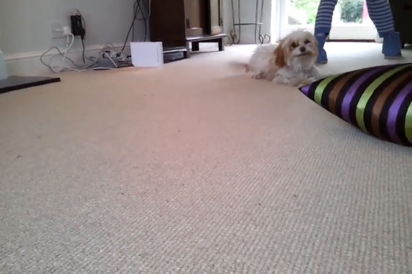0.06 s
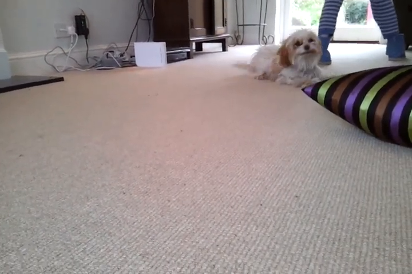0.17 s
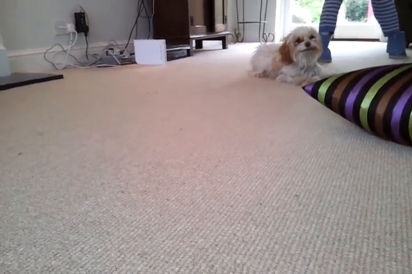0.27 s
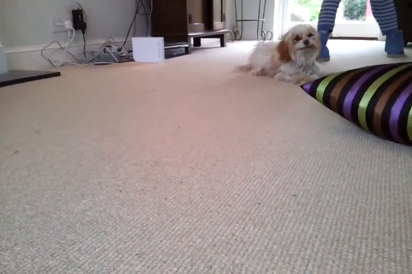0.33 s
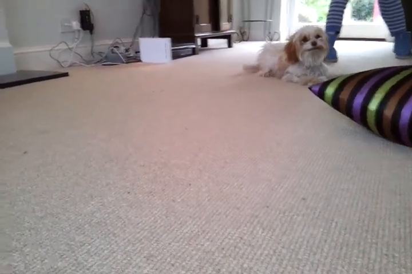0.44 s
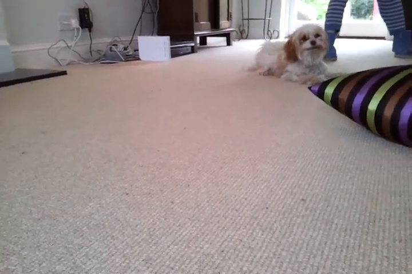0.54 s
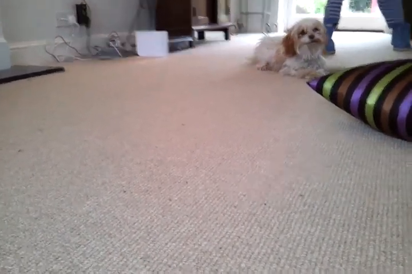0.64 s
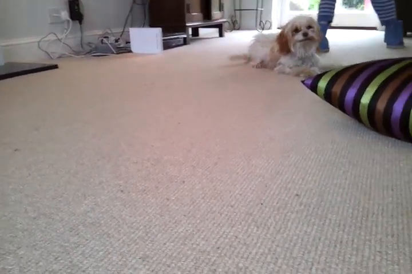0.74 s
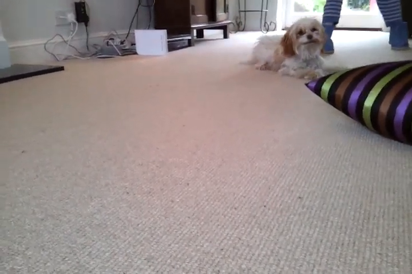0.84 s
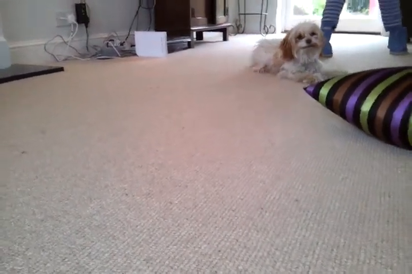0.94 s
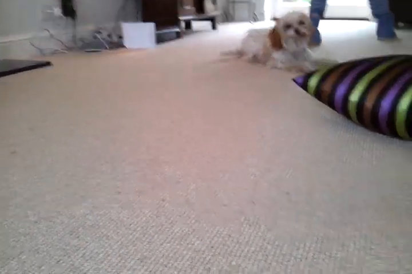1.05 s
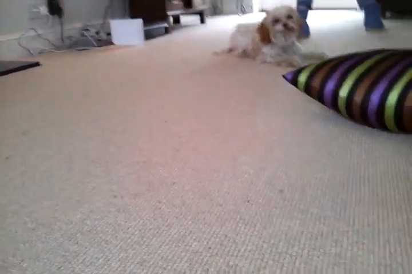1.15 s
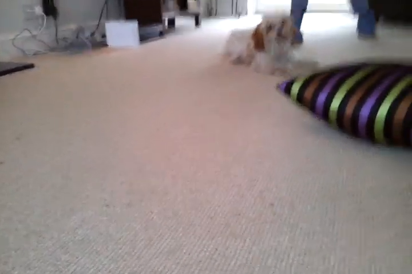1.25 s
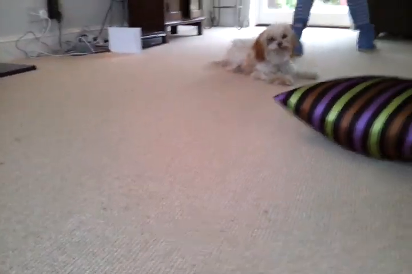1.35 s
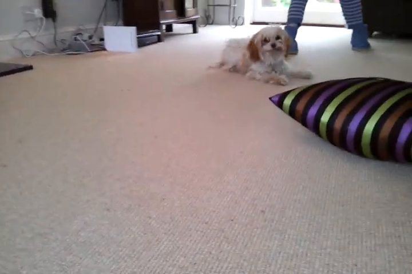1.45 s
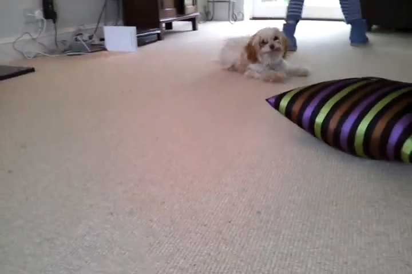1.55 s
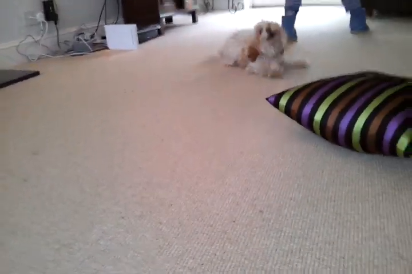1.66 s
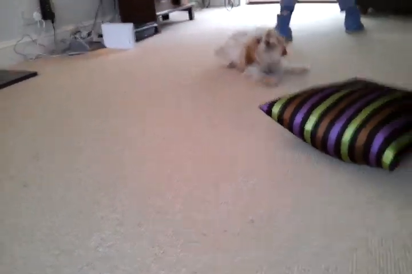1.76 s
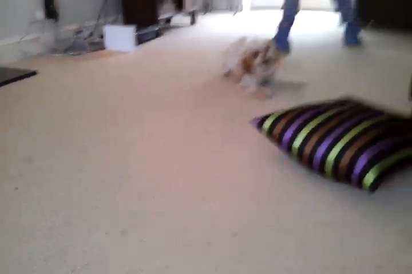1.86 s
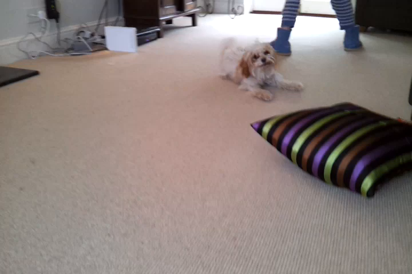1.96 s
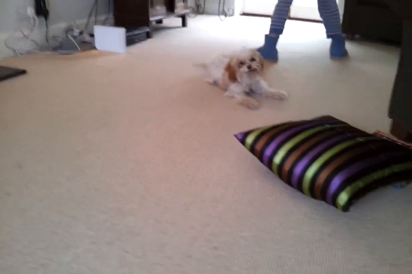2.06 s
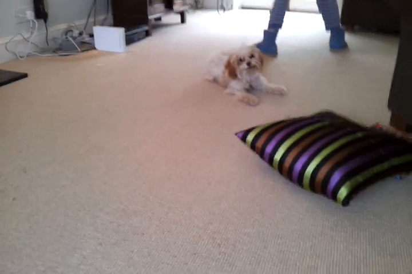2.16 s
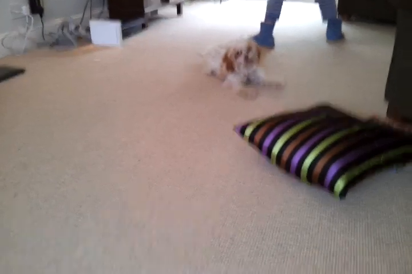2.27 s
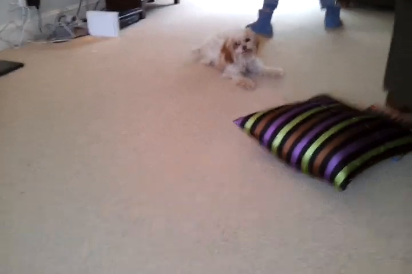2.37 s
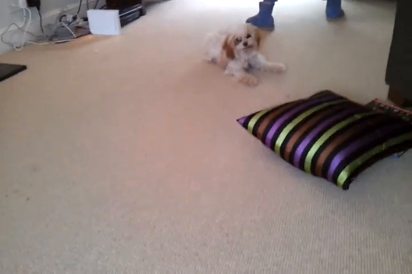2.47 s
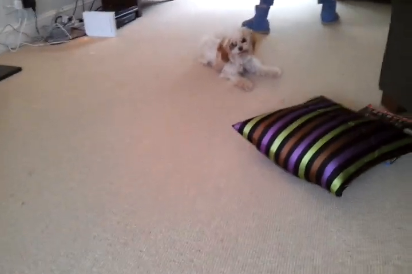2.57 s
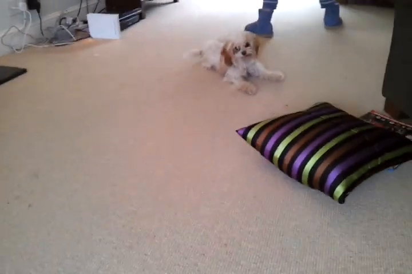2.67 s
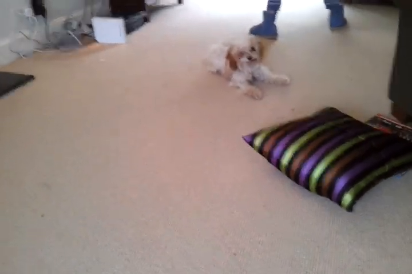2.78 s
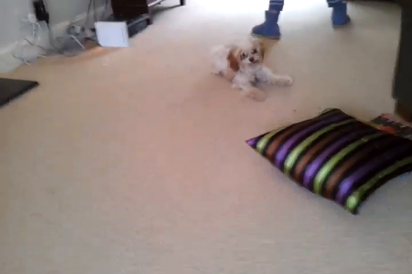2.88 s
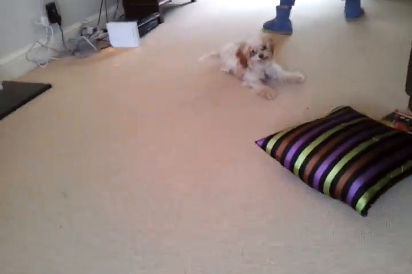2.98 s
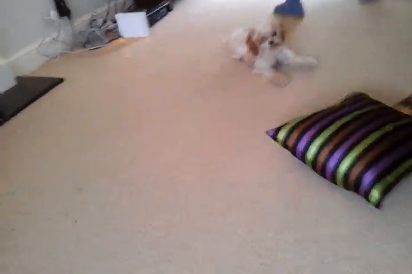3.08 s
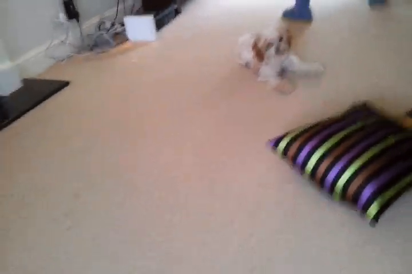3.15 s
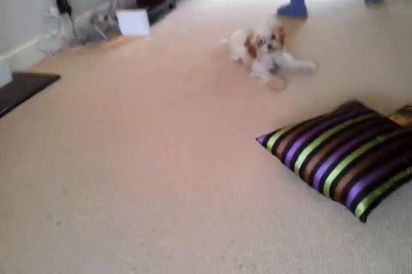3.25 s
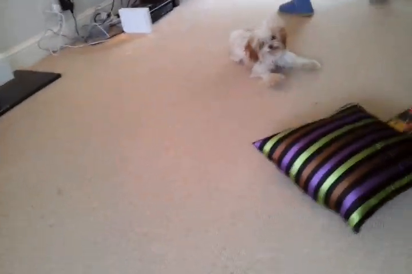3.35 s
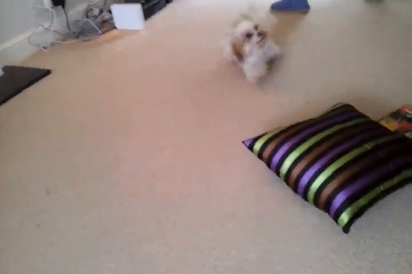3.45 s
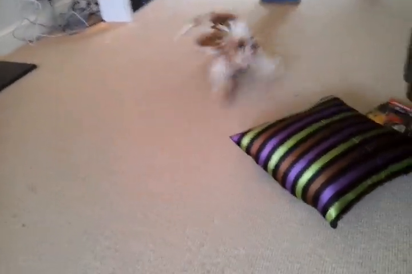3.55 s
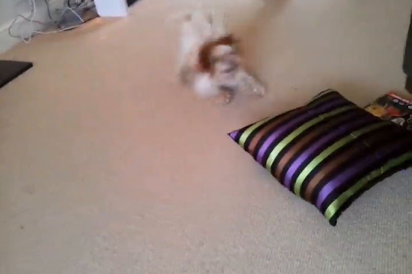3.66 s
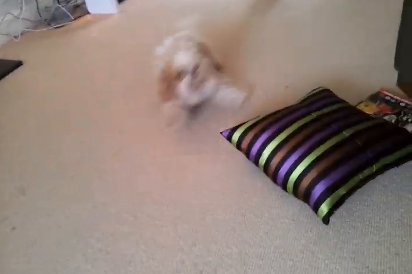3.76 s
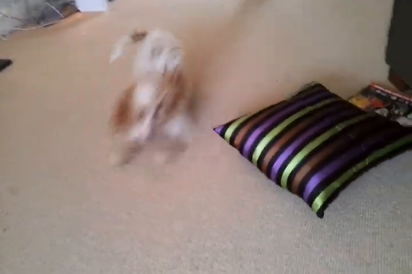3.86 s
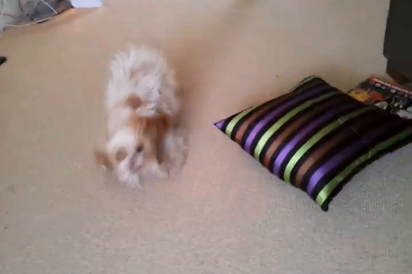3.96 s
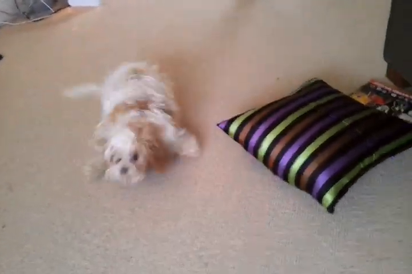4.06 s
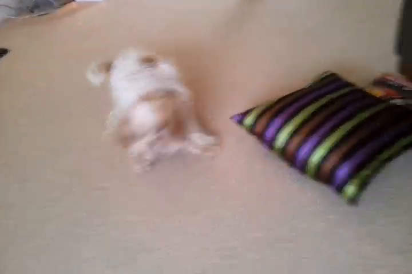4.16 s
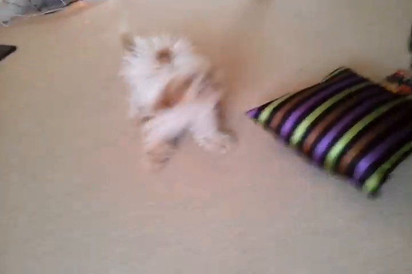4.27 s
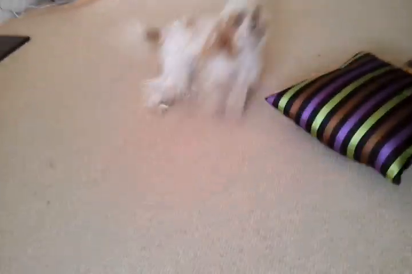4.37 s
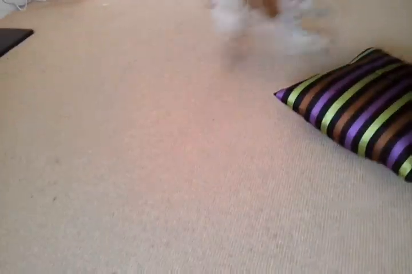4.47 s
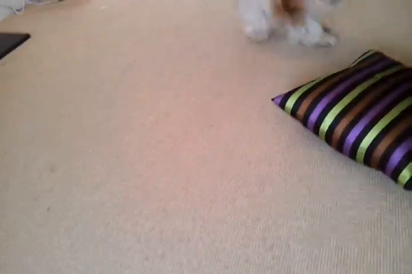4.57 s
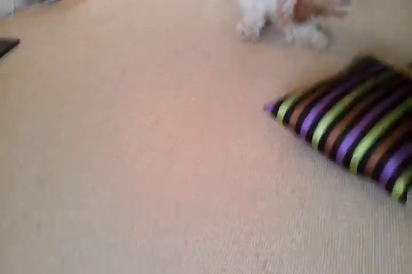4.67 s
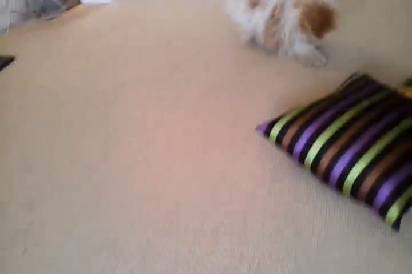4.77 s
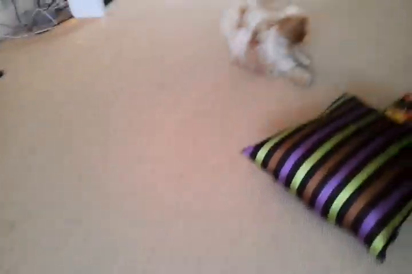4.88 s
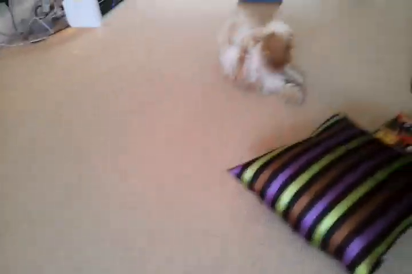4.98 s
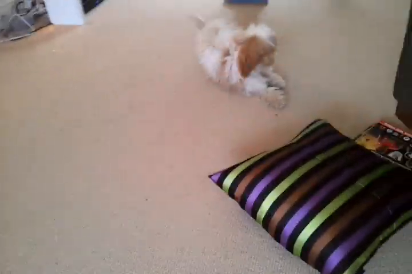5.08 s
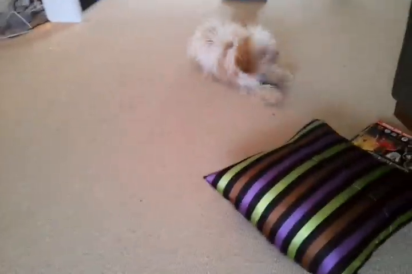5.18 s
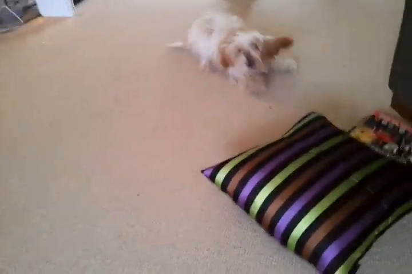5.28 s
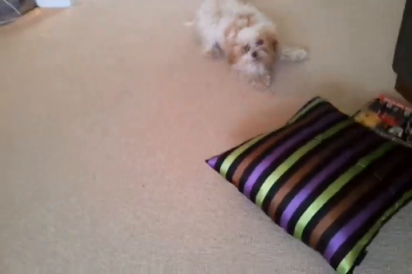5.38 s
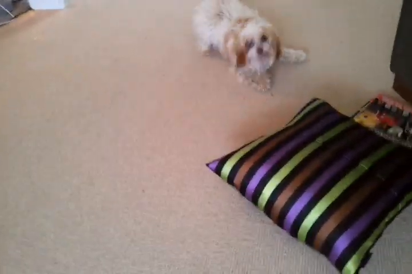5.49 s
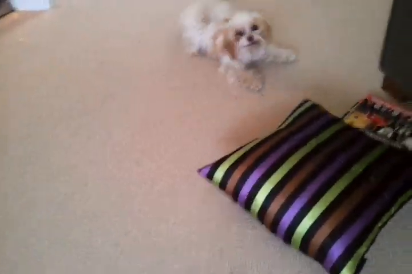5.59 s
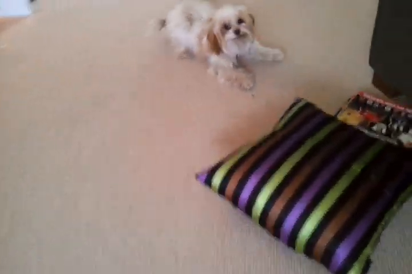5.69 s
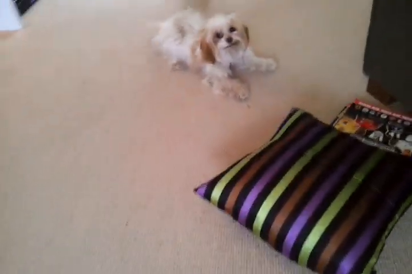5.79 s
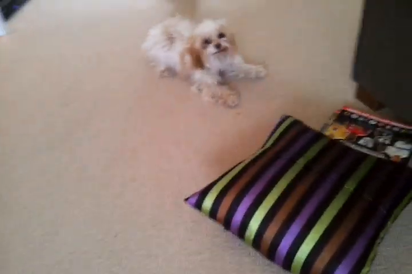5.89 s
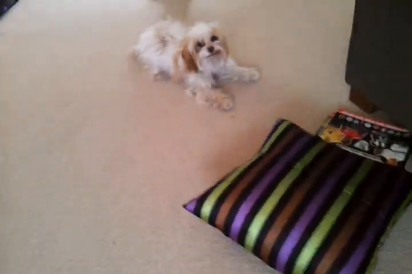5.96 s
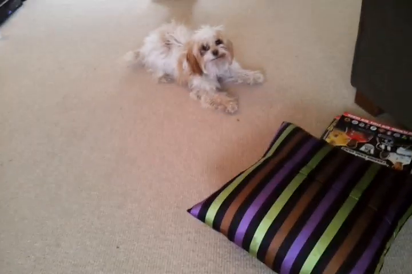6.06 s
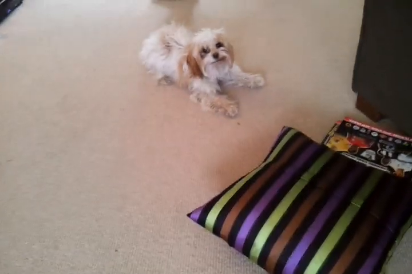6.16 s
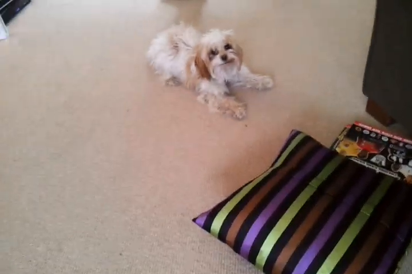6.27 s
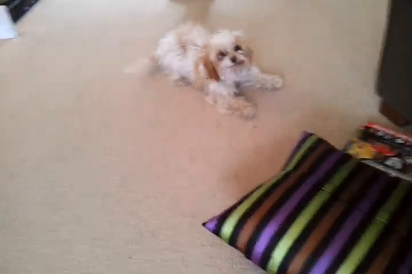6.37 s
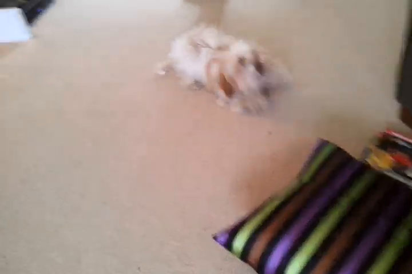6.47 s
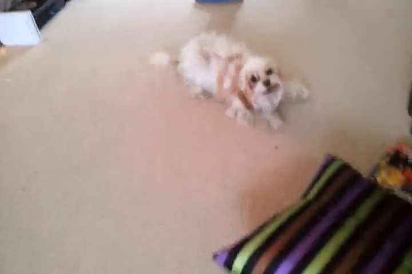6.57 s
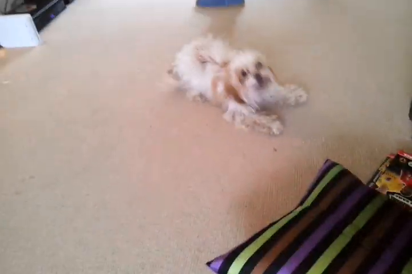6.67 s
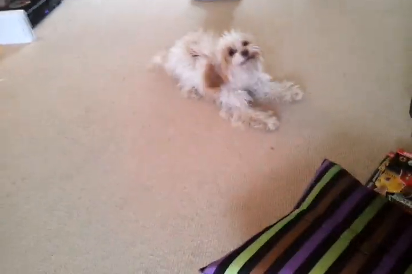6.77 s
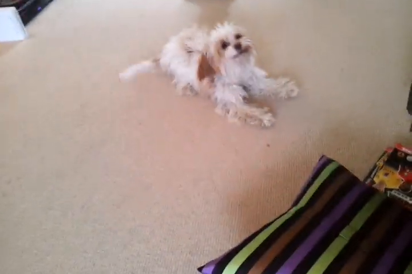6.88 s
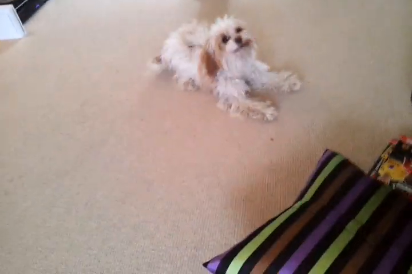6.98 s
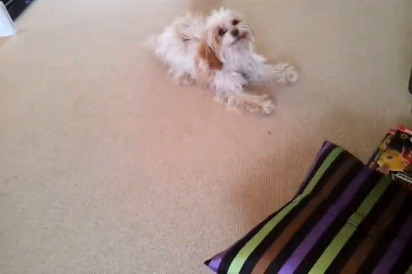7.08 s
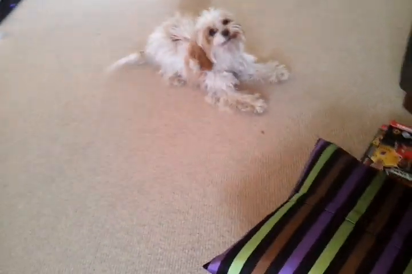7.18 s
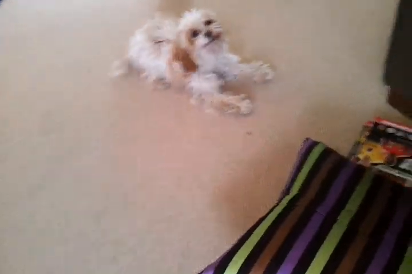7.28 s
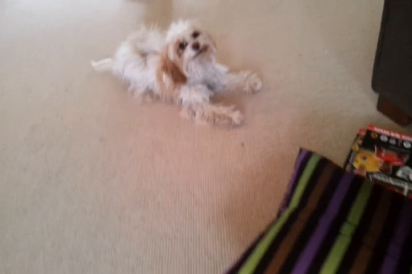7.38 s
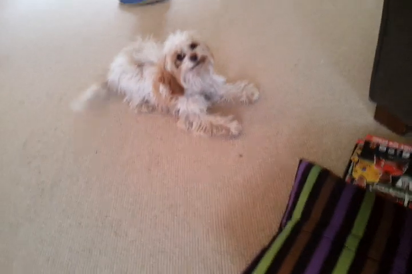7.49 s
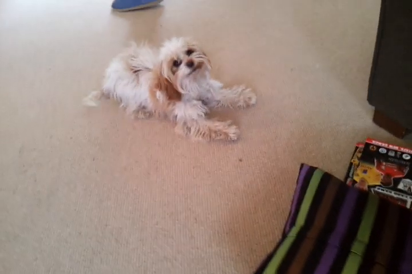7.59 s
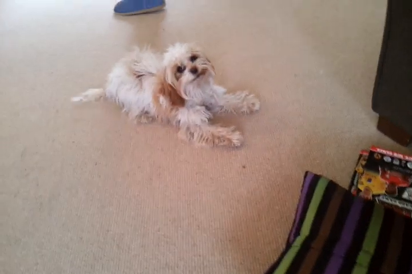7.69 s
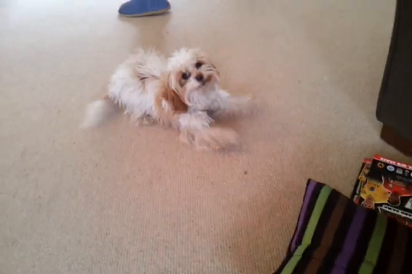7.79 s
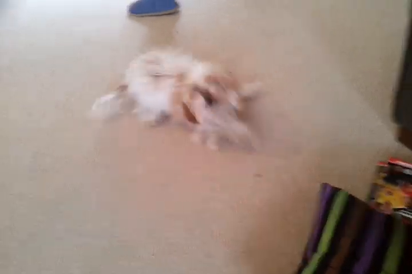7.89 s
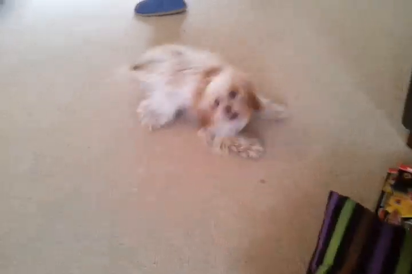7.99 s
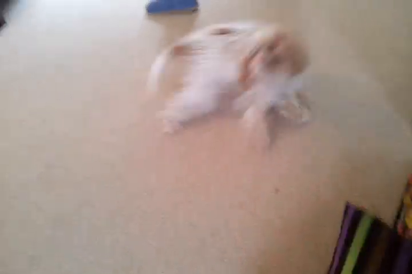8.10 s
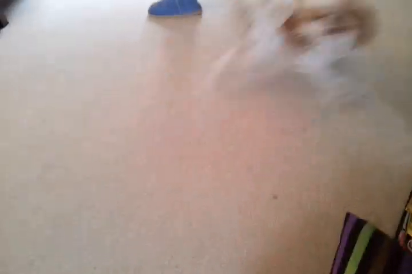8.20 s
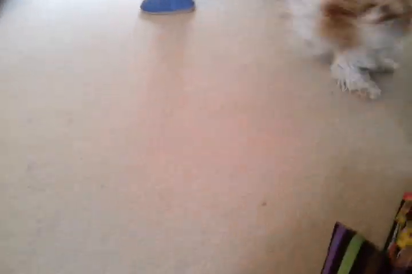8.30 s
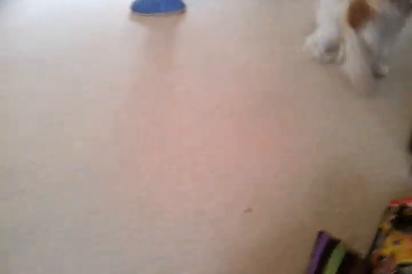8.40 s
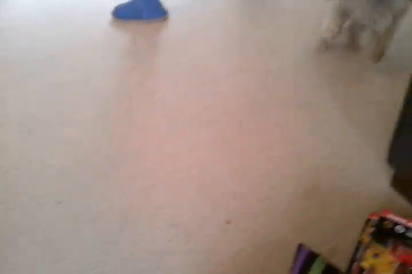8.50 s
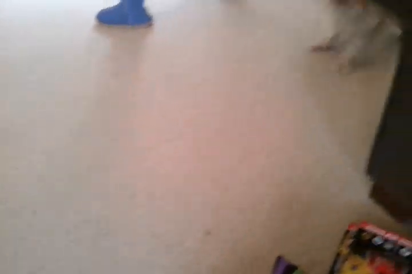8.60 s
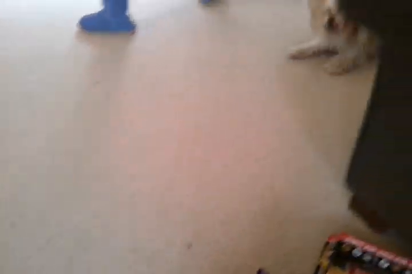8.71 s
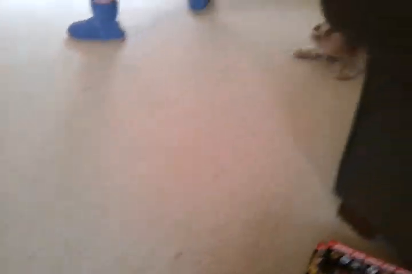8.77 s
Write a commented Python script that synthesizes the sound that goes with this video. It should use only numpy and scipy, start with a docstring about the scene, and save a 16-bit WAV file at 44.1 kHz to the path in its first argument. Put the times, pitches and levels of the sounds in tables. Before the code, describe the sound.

In a quiet furnished room, a little dog lets out short, hoarse yaps, spaced apart at first and then four in quick succession. Between them it grumbles low, with faint whines and wheezes, while its paws thud softly on the carpet and fabric rustles. The loud barks distort a little on the nearby microphone, which also picks up a few light handling ticks.

```python
"""A small dog yaps, growls and grumbles on the carpet of a quiet living room, with faint whines and wheezes.
Its vocal folds pulse through throat and jaw; each yap is an arch of pitch, hoarse at its ends and
clearer on top, and overloads the microphone. Paws thump softly, a hand ticks on the camera,
and cloth brushes as dog and people shift about."""
import sys
import numpy as np
from scipy import signal
from scipy.fft import rfft, irfft, next_fast_len
from scipy.io import wavfile
from scipy.ndimage import uniform_filter1d, map_coordinates

SR = 44100
rng = np.random.default_rng(int(sys.argv[2]) if len(sys.argv) > 2 else 0)


def wav_out(sig):
    """Save sig, one row per channel (or a flat mono array), as 16-bit PCM at SR to the path in sys.argv[1]."""
    wavfile.write(sys.argv[1], SR, np.round(np.clip(np.atleast_2d(sig).T, -1, 1) * 32767).astype(np.int16))


N = 389844


def amp(db):
    """Decibels to gain."""
    return 10 ** (np.asarray(db) / 20)


def clock(length_s):
    """Sample times in seconds."""
    return np.arange(int(length_s * SR)) / SR


def along(points, hz):
    """(Hz, value) points read on a log frequency axis."""
    knots_hz, values = np.transpose(points)
    return np.interp(np.log(hz + 1), np.log(knots_hz + 1), values)


def filtered(x, response):
    """Apply a gain given as a function of Hz."""
    size = next_fast_len(len(x) + 8192)
    return irfft(rfft(x, size) * response(np.fft.rfftfreq(size, 1 / SR)), size)[:len(x)]


def noise(spectrum, size):
    """Coloured noise of rms 1."""
    x = filtered(rng.standard_normal(size), lambda hz: amp(along(spectrum, hz)))
    return x / np.sqrt(np.mean(x ** 2) + 1e-20)


def wobble(rate_hz, size):
    """Smooth random curve, rate_hz knots a second."""
    return map_coordinates(rng.standard_normal(4096), [np.arange(size) * rate_hz / SR], mode="wrap")


def add(track, start_s, x):
    """Mix x into the track from start_s on."""
    start = round(start_s * SR)
    x = x[max(-start, 0):]
    part = track[max(start, 0):][:len(x)]
    part += x[:len(part)]


# Yaps. Each row: start, rise and fall in seconds; start, top and end pitch in Hz; top level in dB;
# swell exponent; start, top and end roughness 0-1; moment of widest jaw as a share of the rise;
# wide and relaxed jaw opening 0-1; wide and relaxed mouth resonance in Hz.
YAPS = [ (-.165, 0.072, 0.059, 623, 885, 909, 1, 12, 0.19, 0.28, 0.46, 0.44, .6, 0.33, 2480, 1500),
        (1.634, .105, .056, 635.7, 818.6, 755, 0.7, 4.8, .25, 0.051, .06, .6, .85, 0.45, 2100, 2480),
        (3.674, .1, 0.095, 558, 888.2, 841.5, 6, 2.46, 1, 0.03, 0.15, .7, 0.51, .25, 2200, 1800),
        (3.988, .058, 0.12, 666, 813.2, 486, 3.1, 4.8, .05, 0.087, 0.65, 0.4, 0.65, 0.3, 3100, 1580),
        (5.317, 0.058, .12, 628.2, 885.8, 611, 5.9, 2.6, .95, 0.26, 1, 0.52, .9, .5, 1702, 1655),
        (6.447, .073, .093, 659.4, 849.3, 624, 3.8, 3.7, 0.33, 0.39, 0.97, .55, 0.63, 0.28, 4600, 1540),
        (7.862, .088, .09, 560, 833, 588, 3.6, 3.4, .55, 0.24, .8, 0.55, 0.61, 0.39, 4660, 1660),
        (8.103, .08, .09, 469.2, 876.8, 602, 7.1, 3.8, .4, 0.053, .85, 0.43, .82, .22, 3005, 1570),
        (8.385, .09, 0.091, 569.5, 836.8, 580, 2.7, 3.5, .5, .08, 0.73, 0.73, .55, .25, 1400, 1420),
        (8.759, .079, .09, 561.8, 849.7, 560, 3.2, 3.6, 0.66, 0.11, .6, .5, 1, .5, 4110, 4700), ]
# Throat response, and what a wide-open mouth adds. Each row: frequency in Hz, gain in dB.
YAP_THROAT = [(150, -22), (400, -17), (620, -11.5), (830, 4.5), (1150, -11.5), (1600, -9.5), (2000, -15.5),
              (2500, -16), (3100, -30.5), (4400, -33), (5500, -35.5), (7000, -31.5), (8500, -71)]
YAP_MOUTH = [(700, -4.5), (1500, 10), (2300, 15), (3200, 26.5), (4500, 34.5), (7000, 12.5)]
# Reverb, weaker as the dog comes nearer. Each row: time in seconds, level in dB re the direct sound.
YAP_REVERB = [(1.7, -7.5), (5.4, -8), (7.9, -10)]


def yaps():
    """One arch of effort each, highest and loudest on top. The jaw snaps open on the way up."""
    swell_db, decay_db = 37.5, 40
    out = np.zeros(N)
    for (start_s, rise_s, fall_s, start_hz, top_hz, end_hz, top_db, swell_power,
         rough_start, rough_top, rough_end, widest_at, wide, relaxed, wide_hz, relaxed_hz) in YAPS:
        t = clock(rise_s + fall_s)
        before = np.maximum(1 - t / rise_s, 0)  # 1 at the start, 0 from the top on
        after = np.maximum(t - rise_s, 0) / fall_s  # 0 up to the top, 1 at the end
        pitch_hz = top_hz + (start_hz - top_hz) * before ** 1.7 + (end_hz - top_hz) * after ** 2.1
        rough = rough_top + (rough_start - rough_top) * before ** 1.425
        rough += (rough_end - rough_top) * after ** 1.425
        db = top_db - swell_db * before ** swell_power - decay_db * after ** 1.69
        jaw = np.exp(-((t / rise_s - widest_at) / 0.29) ** 2)
        opening = wide * jaw + relaxed * (1 - jaw) * (1 - before) * (1 - 0.35 * after)
        ring_hz = wide_hz + (relaxed_hz - wide_hz) * (1 - jaw) ** 2
        yap = voice((pitch_hz, db, rough, opening, ring_hz), YAP_THROAT, YAP_MOUTH,
                    jitter=0.055, jitter_rate_hz=240, flutter_db=3.5, ring_db=5.5, rasp_power=0.96)
        add(out, start_s, room(yap, wet_db=np.interp(start_s, *np.transpose(YAP_REVERB))))
    return out


def voice(controls, throat, mouth, jitter, jitter_rate_hz, flutter_db, ring_db, rasp_power):
    """Vocal folds pulse at the pitch; roughness makes them stumble and turns tone into puffs of noise."""
    pitch_hz, db, rough, opening, ring_hz = np.broadcast_arrays(*controls)
    t = np.arange(len(pitch_hz)) / SR
    rough = np.clip(rough, 0.005, 0.98)
    pitch_hz = pitch_hz * (1 + jitter * rough ** 0.8 * wobble(jitter_rate_hz, len(t)))
    phase = 2 * np.pi * np.cumsum(pitch_hz) / SR
    folds = sum(np.cos(k * phase) * (k * pitch_hz < SR / 5) for k in range(1, 36))
    puffs = rng.standard_normal(SR * 2)[:len(t)] * (1 + 0.8 * np.cos(phase))
    puffs = filtered(puffs, lambda hz: hz ** 2 / (hz ** 2 + 350 ** 2))  # turbulence has little bass
    tone, rasp = [vocal_tract(x, opening, ring_hz, throat, mouth, ring_db) for x in (folds, puffs)]
    fade = np.clip(np.minimum(t, t[-1] - t) / 0.0076, 0, 1)
    level = fade * amp(db + flutter_db * rough * wobble(170, len(t)))
    rasp_share = rough ** rasp_power
    return level * (np.sqrt(1 - rasp_share) * tone + np.sqrt(rasp_share) * rasp)


def vocal_tract(x, opening, ring_hz, throat, mouth, ring_db, ring_octaves=0.11):
    """The throat shapes x; the jaw moves one sharp resonance and, opening, lets out treble. Rms 1."""
    hz, frame_s, spectra = signal.stft(np.pad(x, (0, 512)), SR, nperseg=512, noverlap=448)
    hz = hz[:, None]
    gape, centre_hz = [np.interp(frame_s, np.arange(len(x)) / SR, c) for c in (opening, ring_hz)]
    resonance_db = ring_db / (1 + (np.log2((hz + 1) / centre_hz) / ring_octaves) ** 2)
    gain = amp(along(throat, hz) + along(mouth, hz) * gape + resonance_db)
    shaped = signal.istft(spectra * gain, SR, nperseg=512, noverlap=448)[1][:len(x)]
    running_power = np.abs(uniform_filter1d(shaped ** 2, size=700))
    return shaped / np.sqrt(running_power + 1e-12)


# Growling throat, and what a wide-open mouth adds. Each row: frequency in Hz, gain in dB.
GROWL_THROAT = [(70, -25.5), (120, 17.5), (220, 4), (330, -8), (580, -13.5), (900, -18), (1400, -22.5),
                (2200, -32.5), (2900, -48.5), (4500, -51.5), (7000, -42), (8500, -77)]
GROWL_MOUTH = [(220, -1.5), (600, 27.5), (1400, 34), (3000, 26.5), (4500, 27), (7000, 21)]


def low_voice(controls):
    """The chesty voice of growls and grumbles, with strong room reverb."""
    direct = voice(controls, GROWL_THROAT, GROWL_MOUTH,
                   jitter=0.041, jitter_rate_hz=140, flutter_db=5, ring_db=16.5, rasp_power=0.81)
    return room(direct, wet_db=-0.5)


# Short growls. Each row: start and length in seconds, start and end pitch in Hz,
# start and end level in dB, ratio of mouth resonance to pitch.
GROWLS = [ (0, 0.036, 255, 250, -34.5, -39, 1.3), (1.579, .072, 122, 387, -50, -18.5, 2),
          (4.112, 0.081, 370, 237, -30.5, -23, 2), (7.832, 0.044, 156, 336, -55.5, -19, 1.9),
          (8.005, .055, 471.3, 310, -21, -31.5, 1), (8.077, 0.05, 300.7, 563.4, -33.5, -6, 2.1),
          (8.253, 0.091, 280, 187.6, -39, -36, 2.2), (8.357, 0.084, 200, 405, -30, -23.5, 1.9), ]


def growls():
    """Quick, closed-mouth growls that slide into or out of a yap."""
    shut_above_db = -46
    out = np.zeros(N)
    for start_s, length_s, start_hz, end_hz, start_db, end_db, ring_ratio in GROWLS:
        progress = clock(length_s) / length_s
        pitch_hz = start_hz * (end_hz / start_hz) ** progress
        db = start_db + (end_db - start_db) * progress
        opening = np.clip(0.04 * (shut_above_db - db), 0, 1)  # ajar only in the faintest starts
        rough = 0.17
        add(out, start_s, low_voice((pitch_hz, db, rough, opening, ring_ratio * pitch_hz)))
    return out


# Two long grumbles, one list each. Each row: time in seconds, pitch in Hz, level in dB before trim.
GRUMBLES = [
    [(4.19, 240.7, -26.5), (4.51, 214.1, -37), (4.54, 177.9, -30), (4.57, 174.2, -40),
     (4.688, 213.2, -25.5), (4.76, 210.3, -38), (4.798, 242.3, -28), (4.84, 210, -42), (4.93, 226, -59)],
    [(6.64, 174.6, -40), (6.674, 190.1, -28), (6.722, 190, -37), (6.766, 246.5, -23.5), (6.792, 245, -30),
     (6.984, 125, -48.5), (7.09, 118.3, -51)],
]
# Lip lifts within a grumble. Each row: middle and half-length in seconds, pitch in Hz,
# added level in dB, added opening 0-1, added roughness 0-1, resonance in Hz.
SNARLS = [(4.328, .05, 205.3, 2, 0.07, 0.4, 990), (4.433, .045, 289.4, 16.5, 0.63, 0.2, 585),
          (4.722, .06, 237.2, 14.5, 0.6, 0.33, 1430), (6.763, 0.032, 247, 2, 0.42, .15, 458)]


def grumbles():
    """A low hum behind closed lips; each snarl swells, brighter and rougher, at its own pitch."""
    trim_db, shut_ring_hz = -4.5, 316
    out = np.zeros(N)
    middle_s, half_s, snarl_hz, snarl_db, snarl_opening, snarl_rough, snarl_ring_hz = np.transpose(SNARLS)
    for rows in GRUMBLES:
        knots_s, *columns = np.transpose(rows)
        t = knots_s[0] + clock(knots_s[-1] - knots_s[0])
        hum_hz, hum_db = [np.interp(t, knots_s, c) for c in columns]
        away = ((t[:, None] - middle_s) / half_s) ** 2
        swell, lift = np.exp(-away), np.exp(-away ** 2)
        shut = 1 - lift.sum(axis=1)
        pitch_hz = shut * hum_hz + lift @ snarl_hz
        ring_hz = shut * shut_ring_hz + lift @ snarl_ring_hz
        db = hum_db + trim_db + swell @ snarl_db
        rough = 0.083 + lift @ snarl_rough
        opening = 0.067 + lift @ snarl_opening
        add(out, knots_s[0], low_voice((pitch_hz, db, rough, opening, ring_hz)))
    return out


# Whimpers. Each row: middle and half-length in seconds, top pitch in Hz, top level in dB.
WHINES = [(1.146, .13, 760, -57), (1.251, 0.032, 1287, -55.5), (1.49, 0.018, 1083, -51),
          (7.603, 0.017, 1061, -41.5)]


def whines():
    """Faint arches of tone with the mouth almost shut."""
    fade_db, sag, rough, opening = 6, 0.015, 0.23, 0.1
    out = np.zeros(N)
    for middle_s, half_s, top_hz, top_db in WHINES:
        edge = (clock(2 * half_s) / half_s - 1) ** 2
        controls = top_hz * (1 - sag * edge), top_db - fade_db * edge, rough, opening, top_hz
        whine = voice(controls, YAP_THROAT, YAP_MOUTH,
                      jitter=0.04, jitter_rate_hz=200, flutter_db=2.5, ring_db=12, rasp_power=0.9)
        add(out, middle_s - half_s, room(whine, wet_db=-1.5))
    return out


# Whistling edge of a snarl. Each row: middle and half-length in seconds, pitch in Hz,
# top level in dB, whistle at the middle in Hz.
WHEEZES = [(4.709, 0.075, 236, -42.5, 4060), (6.745, 0.078, 234, -42.5, 4600),
           (7.887, .035, 314.5, -30.5, 4843), (8.409, 0.046, 335, -40, 4320)]
# Nasal response. Each row: frequency in Hz, gain in dB.
NOSE = [(500, -64), (2000, -19), (3800, -1.5), (5500, -2.5), (7000, 0.5), (8500, -33)]


def wheezes():
    """Air whistles through the nose, swelling and fading as its resonance sinks."""
    fade_db, sag_hz_per_s, rough, opening = 20, 13000, 0.74, 0.35
    out = np.zeros(N)
    for middle_s, half_s, pitch_hz, top_db, whistle_hz in WHEEZES:
        t = clock(2 * half_s) - half_s
        db = top_db - fade_db * (t / half_s) ** 2
        ring_hz = whistle_hz - sag_hz_per_s * t
        wheeze = voice((pitch_hz, db, rough, opening, ring_hz), NOSE, YAP_MOUTH,
                       jitter=0.031, jitter_rate_hz=220, flutter_db=3, ring_db=15.5, rasp_power=0.35)
        add(out, middle_s - half_s, room(wheeze, wet_db=-8.5))
    return out


# Paws on carpet, and a hand on the camera. Each row: start in seconds, level in dB before trim.
PAW_STEPS = [(3.029, -49), (3.369, -37), (3.429, -32), (3.623, -28.5), (3.884, -29.5), (6.324, -36),
             (7.598, -45)]
HAND_TICKS = [(1.178, -35.5), (2.538, -42), (3.099, -42), (4.885, -25), (5.778, -64)]
# Their spectra. Each row: frequency in Hz, relative level in dB.
PAW_SPECTRUM = [(35, -46.5), (60, -24.5), (223, -10), (301, -1.5), (655, -5.5), (956, -9.5), (1310, -15.5),
                (2080, -39), (7000, -40), (9100, -72), (15400, -120)]
TICK_SPECTRUM = [(200, -0.5), (900, 2.5), (2000, -4), (4500, -23), (7000, -5), (8500, -40)]


def knocks(events, spectrum, t60_s, trim_db):
    """Dull contacts: decaying noise bursts with no ring of their own."""
    out, t = np.zeros(N), clock(0.25)
    for start_s, db in events:
        blow = amp(db + trim_db - 60 * t / t60_s) * noise(spectrum, len(t))
        add(out, start_s, room(blow, wet_db=-7))
    return out


# Cloth strokes. Each row: peak time, rise and fall in seconds, level in dB.
CLOTH_STROKES = [(.82, 0.059, 0.045, -51.5), (1.05, 0.15, 0.065, -52), (1.32, 0.18, 0.33, -52),
                 (1.959, 0.1, 0.11, -32.5), (2.336, 0.14, 0.043, -42.5), (2.77, 0.095, 0.11, -52),
                 (3.44, 0.073, 0.1, -48.5), (4.3, 0.19, 0.14, -52.5), (4.86, 0.42, 0.22, -49.5),
                 (7.58, 0.044, 0.086, -53), (8.65, .35, 0.17, -46)]
# Friction spectrum. Each row: frequency in Hz, relative level in dB.
CLOTH_SPECTRUM = [(120, -49.5), (200, -16), (580, -14.5), (705, -15.5), (791, -8.5), (1270, -18.5),
                  (2180, -10.5), (4270, -12), (4710, -8.5), (7330, -8), (9060, -42), (10000, -87),
                  (13000, -119), (22000, -120)]


def cloth():
    """Fabric slides over carpet in uneven strokes that swell and fade."""
    t = np.arange(N) / SR
    level = np.zeros(N)
    for peak_s, rise_s, fall_s, db in CLOTH_STROKES:
        width_s = np.where(t < peak_s, rise_s, fall_s)
        level += amp(db) * np.exp(-((t - peak_s) / width_s) ** 2)
    flicker = amp(1.1 * wobble(49, N))
    return level * flicker * noise(CLOTH_SPECTRUM, N)


# Room decay. Each row: frequency in Hz, T60 in seconds.
ROOM_T60 = [(100, 0.44), (800, 0.34), (2500, 0.3), (7000, 0.28)]


def room(x, wet_db):
    """The direct sound plus a short furnished-room tail."""
    hz, t, spectra = signal.stft(rng.standard_normal(SR * 2 // 3), SR, nperseg=256)
    decay = amp(-60 * t / along(ROOM_T60, hz)[:, None])
    tail = signal.istft(spectra * decay, SR, nperseg=256)[1]
    tail[:SR // 300] = 0  # the first wall answers a few ms late
    response = amp(wet_db) * tail / np.linalg.norm(tail)
    response[0] = 1
    return signal.fftconvolve(x, response)


# Room background. Each row: frequency in Hz, relative level in dB.
HUSH_SPECTRUM = [(15, -35), (25, -9), (65, -12.5), (92, -1), (124, -6.5), (239, -6), (322, -6.5), (519, -8),
                 (684, -9.5), (756, -12), (901, -10.5), (1960, -13), (2220, -17), (6530, -13), (10000, -52),
                 (13000, -84.5), (22000, -120)]


def hush(level_db):
    """Steady, faint noise of the quiet room."""
    return amp(level_db) * noise(HUSH_SPECTRUM, N)


def scene():
    """Dog, small movements and room hush, in mono."""
    dog = yaps() + growls() + grumbles() + whines() + wheezes()
    paws = knocks(PAW_STEPS, PAW_SPECTRUM, t60_s=0.17, trim_db=-5)
    ticks = knocks(HAND_TICKS, TICK_SPECTRUM, t60_s=0.025, trim_db=-4)
    return (dog + paws + ticks + cloth() + hush(level_db=-56))[None]


def overload(x, ceiling, hardness, lean):
    """The microphone flattens loud peaks, one side a little before the other."""
    x = x + lean * x * x / (1 + np.abs(x))
    return x / (1 + np.abs(x / ceiling) ** hardness) ** (1 / hardness)


# Microphone chain response. Each row: frequency in Hz, gain in dB.
MIC_RESPONSE = [(20, 0), (4500, 1.5), (6500, -3), (7400, -6.5), (8200, -19.5), (9300, -46), (15800, -29)]


def record(dry):
    """Overload, a narrow band and a coupling capacitor; overshoots clip again before the band limit."""
    coupling_hz, limit_hz = 9, 15850
    x = overload(dry[0], ceiling=0.55, hardness=10, lean=0.1)
    x = filtered(x, lambda hz: amp(along(MIC_RESPONSE, hz)) * 1j * hz / (coupling_hz + 1j * hz))
    x = np.clip(x, -0.74, 0.74)
    return filtered(x, lambda hz: hz < limit_hz)[None]


dry = scene()
out = record(dry)
wav_out(out)
```